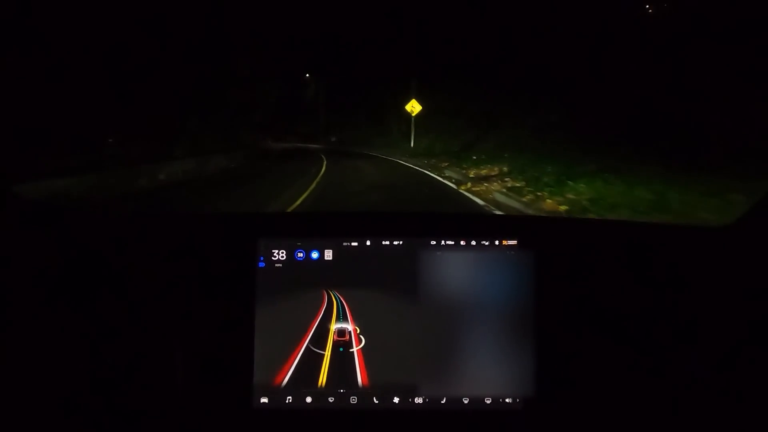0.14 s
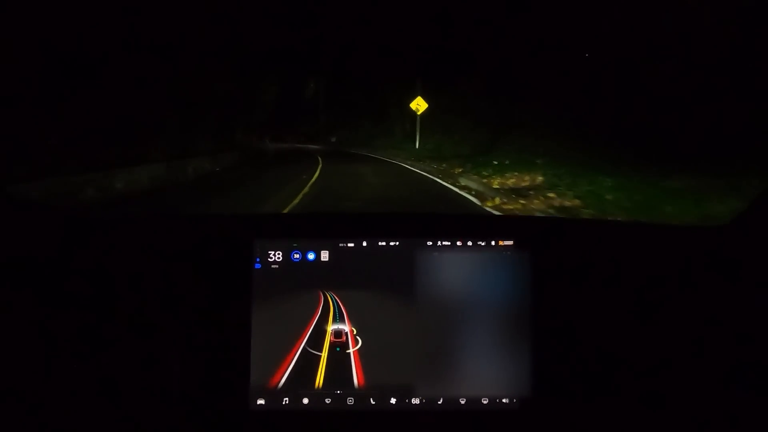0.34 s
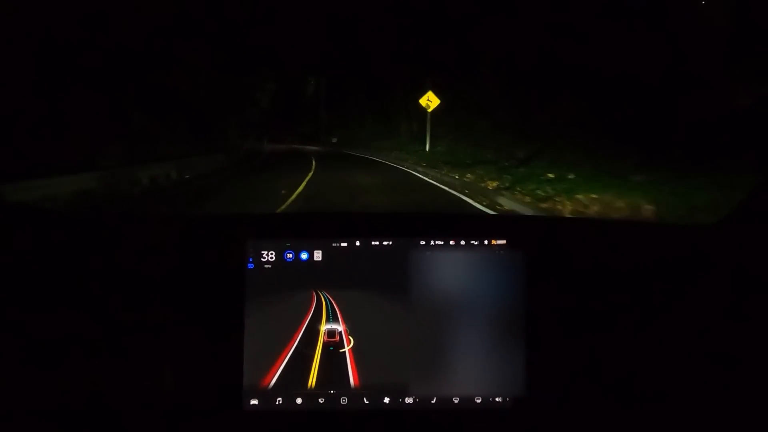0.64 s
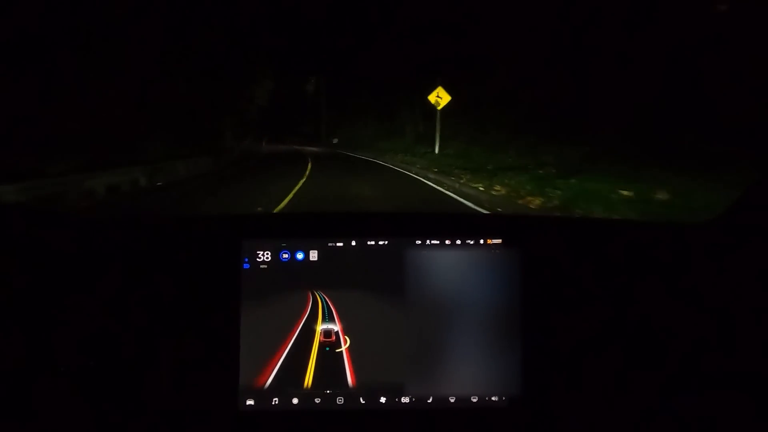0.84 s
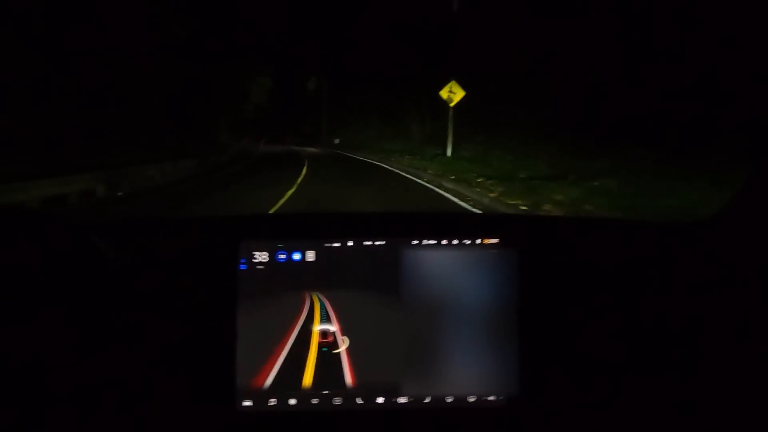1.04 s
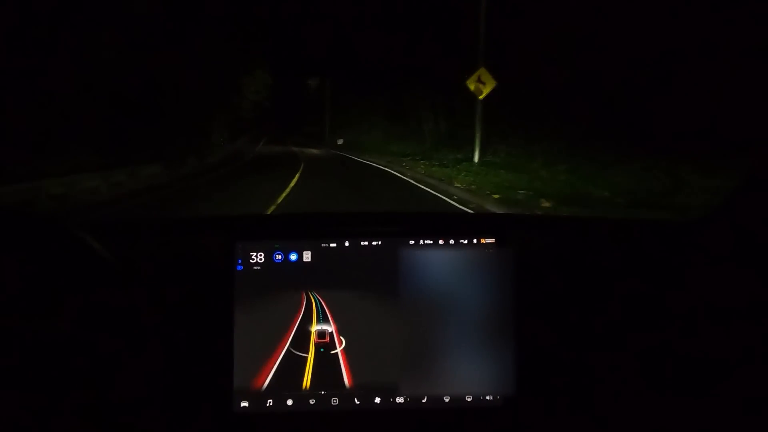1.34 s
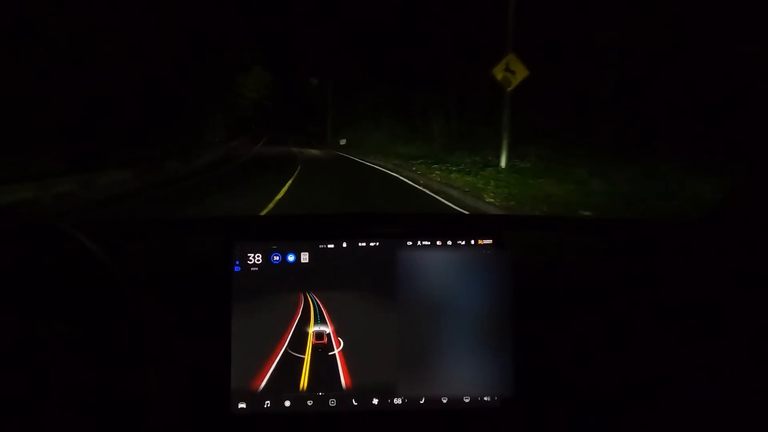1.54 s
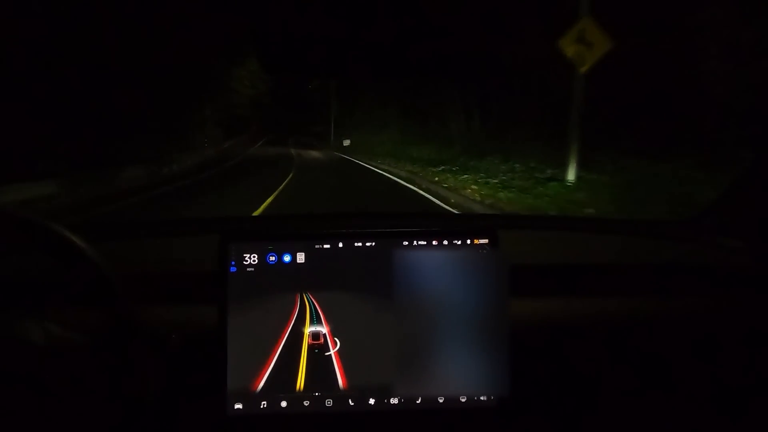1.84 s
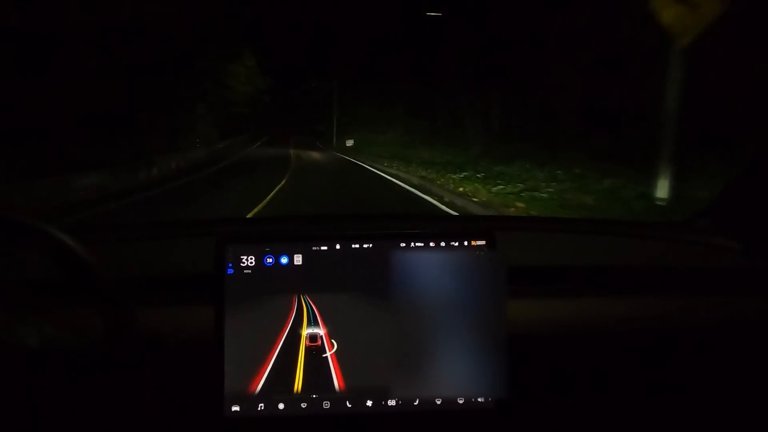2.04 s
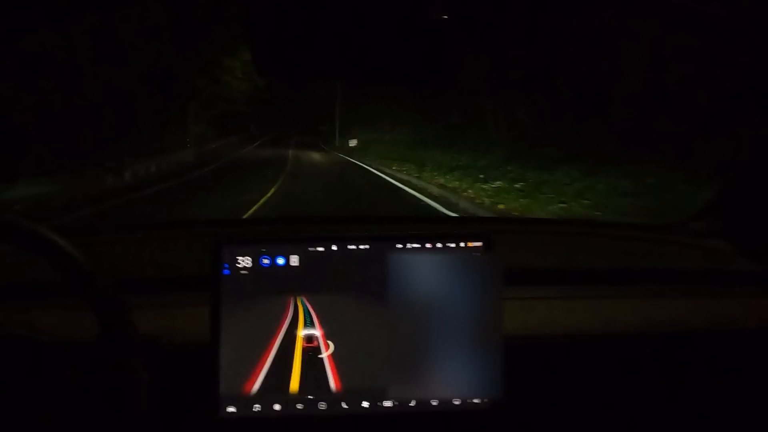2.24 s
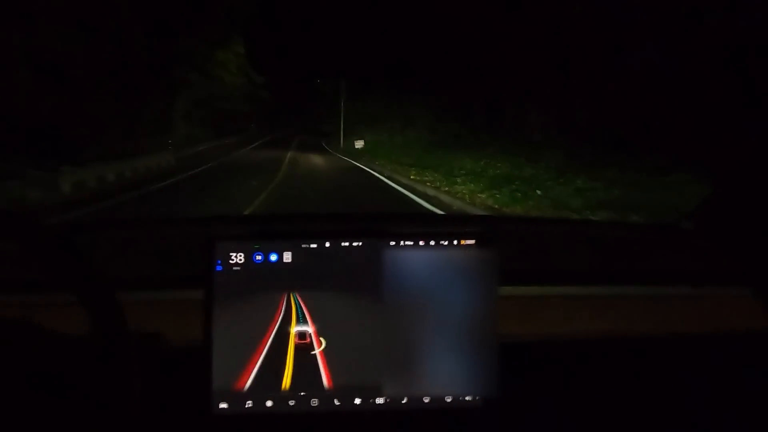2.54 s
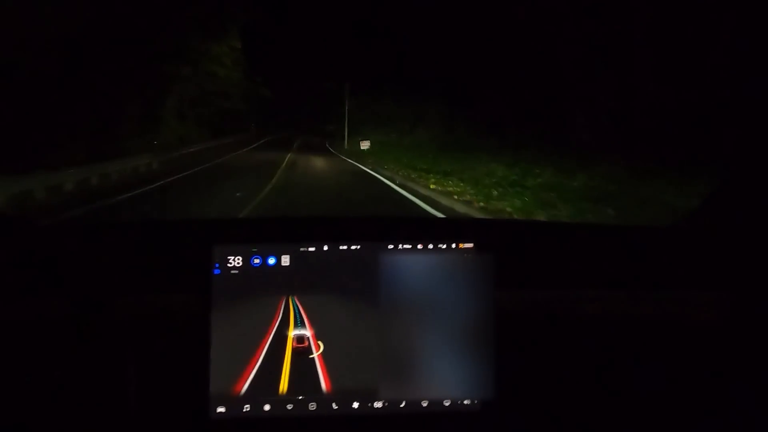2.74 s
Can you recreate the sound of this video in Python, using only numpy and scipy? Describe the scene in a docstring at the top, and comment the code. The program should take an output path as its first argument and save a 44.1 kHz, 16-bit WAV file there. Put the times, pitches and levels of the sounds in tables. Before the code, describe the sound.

Deep road rumble fills an electric car's cabin as something loose slides twice.

```python
"""Tyres drone through the body of an electric car on a country road at night and ring the cabin.
Twice the car shudders over uneven road, swaying the cabin air at a very low frequency.
Something loose slides and hisses by stick-slip friction, and knocks once against the trim.
The deep shudder pushes an automatic gain control down, and the road noise creeps back afterwards."""
import sys
import numpy as np
from scipy import signal
from scipy.fft import rfft, irfft
from scipy.io import wavfile

SR = 44100
rng = np.random.default_rng(int(sys.argv[2]) if len(sys.argv) > 2 else 0)


def put_to_file(sound):
    """Save the sound as 16-bit audio at rate SR, in the file named by the first command-line argument."""
    columns = np.atleast_2d(sound).T  # one column per channel
    safe = np.clip(columns, -1, 1)
    whole_steps = np.round(safe * 32767)
    wavfile.write(sys.argv[1], SR, whole_steps.astype(np.int16))


N = 127890
T = np.arange(N) / SR
HZ = np.fft.rfftfreq(N, 1 / SR)

# Noise spectra. Each row: frequency in Hz, relative spectral density in dB.
BOOM_SPECTRUM = [(8, -33.5), (20, 0.5), (28, -2), (36, -0.5), (48, -12.5), (65, -19), (120, -49.5),
                 (600, -140)]  # deep boom of the cabin air
RUMBLE_SPECTRUM = [(25, -24.5), (52, 1), (76, 4.5), (96, -1.5), (122, 0), (160, -10.5), (205, -12.5),
                   (255, -12.5), (330, -23), (450, -30.5), (800, -49.5), (3000, -125)]  # road noise through the body
ROAR_SPECTRUM = [(100, -13.5), (400, 7), (650, -2.5), (1000, 2), (1300, -4), (1550, -12), (1850, -16),
                 (2300, -21.5), (3500, -28.5), (5000, -36), (7300, -43.5), (10000, -51.5), (15000, -68)]  # tread and air
HISS_SPECTRUM = [(200, -14.5), (900, 4.5), (1350, 2), (1800, 0.5), (2600, -6.5), (3700, -7.5),
                 (4700, -18.5), (5800, -22), (7400, -23.5), (9000, -37), (12000, -48.5), (16000, -63.5)]  # middle of the sliding sound
SCRAPE_SPECTRUM = [(30, -45.5), (180, -15.5), (270, -0.5), (315, 4), (370, 6), (520, 9), (660, 7.5),
                   (820, 0), (1200, -6), (2200, -20), (6000, -42), (12000, -78)]  # its low part
FIZZ_SPECTRUM = [(500, -33.5), (2000, 0.5), (4500, 2), (5900, 0), (7300, -2.5), (8300, -12), (9500, -17.5),
                 (12000, -25.5), (16000, -49)]  # its bright part
# Coarseness of the road. Each row: time in seconds, gains in dB of boom, rumble, roar and tyre hum.
ROAD_SURFACE = [(0, -2, -1, -0.5, 1), (0.401, -1, -1.5, -.5, -1.5), (0.599, -2, -0.64, -1, 4),
                (0.901, -3.5, -0.5, -.5, 2.5), (1.22, 3, -1.3, -1.2, -0.5), (1.33, 5.5, -4.5, 1, -8.5),
                (1.601, -1, -2.1, -2.5, -5), (1.901, 3.5, 0.5, -0.5, 1.5), (2.16, 3.5, 1, 0.8, 3),
                (2.45, 6.5, 1.5, 1.5, 1.5), (2.61, 7, -4, -1, -5), (2.76, 3, 0, -3, 1.5),
                (2.87, 0.5, -11.5, 0, 3)]
# Air resonances. Each row: frequency in Hz, half width in Hz, rms level in dB before the road's gain.
TYRE_MODES = [(182.66, 12, -31.5), (194.7, 11, -33.5)]
CABIN_MODES = [(309, 24, -43.5), (376.5, 20, -44.5), (579, 11, -51.5), (763, 46, -51.5), (994, 26, -60.5)]
# Shudders of the body. Each row: peak time and half length in seconds, frequency in Hz,
# level in dB, relative level of the octave in dB.
SHUDDERS = [(1.379, 0.13, 20.86, -7, -19.5), (2.554, 0.13, 17.38, -14, 8.5)]
# Slides of the loose object. Each row: peak time, rise and fall time constants in seconds,
# hiss level in dB before SLIDING_DB, scrape and fizz in dB relative to the hiss.
SLIDE_EVENTS = [(.022, .0051, .015, -62, -14.5, -10), (.944, 0.0076, 0.022, -66, -5.5, -15),
                (1.08, .0015, 0.0033, -43.5, -9, -21), (1.089, .003, 0.0065, -49, -12, -15),
                (1.096, .005, 0.014, -48.5, -15, -16), (1.14, .039, 0.067, -66.5, -8, -4.5),
                (1.205, 0.0036, .008, -60, -10, -17), (1.235, 0.0022, 0.0227, -59.5, -12, -3),
                (1.264, 0.0095, 0.016, -51, -10, -12), (1.288, .01, 0.013, -44, -6, -9),
                (1.307, .012, 0.041, -50, -7, -10), (1.356, .012, .03, -55, -10, -11.5),
                (2.21, .0044, .02, -63, -11.5, -14.5), (2.345, 0.0061, 0.023, -53.5, 0, -8),
                (2.377, 0.014, .026, -48.5, -3, -11.5), (2.411, .018, .03, -45, -0.5, -12.5),
                (2.427, 0.009, 0.0091, -63, -9.5, 9.5), (2.456, 0.012, 0.027, -48.5, -11, -12),
                (2.516, .003, .012, -43.5, -5.5, -16), (2.534, 0.017, .03, -42.5, 0, -12.5),
                (2.555, .008, .008, -50.5, 9, -9), (2.573, .003, 0.044, -40.5, -3.5, -12),
                (2.6, .008, .02, -51, -10, -8.5), (2.626, .012, 0.02, -47, 6, -13),
                (2.701, .003, 0.056, -62.5, -20, -6), (2.866, .008, 0.036, -64, -17, -6)]
# Resonances of the loose object. Each row: frequency in Hz, half width in Hz, lift in dB.
OBJECT_MODES = [(1800, 160, 3.5), (2780, 70, 0), (3000, 110, 1), (4170, 42, 4.5), (4640, 45, 5.5)]
# Modes of the trim. Each row: frequency in Hz, relative level in dB, seconds to decay by 60 dB.
TRIM_MODES = [(321.3, -34, 0.35), (620, -33.5, 0.045), (770, -27, 0.035), (1060, -27, 0.028),
              (1720, -36.5, .018), (2480, -47, 0.016), (4215, -50, .07)]
# Likeness of the sound at the two microphones. Each row: frequency in Hz, coherence from 0 to 1.
ROAD_COHERENCE = [(60, .998), (130, .99), (290, .97), (640, .83), (1400, .73), (3100, .42), (6800, .3),
                  (12000, .7)]
SLIDE_COHERENCE = [(200, .96), (700, .78), (1500, .7), (3100, .4), (6800, .25), (10000, .7)]
# Stereo balance of the noises. Each row: frequency in Hz, left minus right in dB.
LEFT_BALANCE = [(100, -0.5), (220, -1), (380, -1.6), (700, -4.5), (2400, -4.5), (4400, -4.5), (8500, 1)]
# Phase difference of the sliding sound. Each row: frequency in Hz, lead of the left side in radians.
SLIDE_LEAD = [(300, 0.17), (1800, 0.42), (2800, 0.34), (4800, 0.064)]

BOOM_DB, RUMBLE_DB, ROAR_DB, SLIDING_DB = -19, -20, -43.5, 6
GRAIN_DB, GRAIN_S = 3, 0.0007  # depth and time scale of stick and slip
KNOCK_AT_S, KNOCK_RISE_S = 2.5685, 0.00058
RIPPLE_DB, REFLECTION_DECAY_S = 2, 0.014
THRESHOLD_DB, DUCK_DB_PER_DB, SENSE_S, RECOVERY_DB_PER_S = -13.5, 0.83, 0.156, 0.5
FADE_S, CUTOFF_HZ = 0.008, 15700


def road_noise():
    """Forced vibration: rough asphalt drives tyres, body and cabin air, at levels set by its coarseness."""
    times, *gains = np.transpose(ROAD_SURFACE)
    boom_db, rumble_db, roar_db, hum_db = [np.interp(T, times, gain) for gain in gains]
    boom = steadied(noise(amp(curve(BOOM_SPECTRUM)), ROAD_COHERENCE), seconds=0.1)
    boom *= amp(BOOM_DB + boom_db)
    rumble = steadied(noise(amp(curve(RUMBLE_SPECTRUM)), ROAD_COHERENCE), seconds=0.13)
    rumble *= amp(RUMBLE_DB + rumble_db)
    tyre_hum = air_resonances(TYRE_MODES, steady_s=0.18) * amp(hum_db)
    cabin_ring = air_resonances(CABIN_MODES, steady_s=0.4) * amp(roar_db)
    roar = noise(amp(curve(ROAR_SPECTRUM)) * cabin_reflections(), ROAD_COHERENCE)
    roar *= amp(ROAR_DB + roar_db + 0.49 * wander(seconds=0.032))
    return boom + rumble + tyre_hum + cabin_ring + roar


def air_resonances(modes, steady_s):
    """Resonance: enclosed air, driven at random by the road, rings in a narrow band at each mode."""
    return sum(amp(db) * steadied(noise(peak(hz, width), ROAD_COHERENCE), steady_s)
               for hz, width, db in modes)


def shudder():
    """Structure-air coupling: at each bump the body sways the cabin air at a low tone and its octave."""
    sway = np.zeros(N)
    for peak_s, half_s, hz, db, octave_db in SHUDDERS:
        phase = 2 * np.pi * hz * (T - peak_s) + 0.21 * wander(seconds=0.23)
        swell = amp(db) * np.exp(-abs((T - peak_s) / half_s) ** 4.2)
        sway += swell * (np.sin(phase) + amp(octave_db) * np.sin(2 * phase))
    return sway * pan(left_db=0.3)


def sliding():
    """Stick-slip friction: grainy hiss, scrape and fizz swell and die with each slide; powers add."""
    hiss, scrape, fizz = np.zeros((3, N))
    for peak_s, rise_s, fall_s, db, scrape_db, fizz_db in SLIDE_EVENTS:
        level = amp(db) * np.exp(-np.maximum((peak_s - T) / rise_s, (T - peak_s) / fall_s))
        hiss += level ** 2
        scrape += (level * amp(scrape_db)) ** 2
        fizz += (level * amp(fizz_db)) ** 2
    object_db = sum(db * peak(hz, width) for hz, width, db in OBJECT_MODES)
    colour = cabin_reflections() * amp(object_db)
    friction = np.zeros((2, N))
    for power, spectrum in [(hiss, HISS_SPECTRUM), (scrape, SCRAPE_SPECTRUM), (fizz, FIZZ_SPECTRUM)]:
        grain = unit_rms(amp(GRAIN_DB * wander(GRAIN_S)))
        band = noise(amp(curve(spectrum)) * colour, SLIDE_COHERENCE, curve(SLIDE_LEAD))
        friction += np.sqrt(power) * grain * band
    return amp(SLIDING_DB) * friction


def trim_knock():
    """Free vibration: after one light blow, the damped modes of the trim decay exponentially."""
    age = np.maximum(T - KNOCK_AT_S, 0)
    ring = sum(amp(db - 60 * age / t60) * np.sin(2 * np.pi * (hz * age + rng.random()))
               for hz, db, t60 in TRIM_MODES)
    attack = 1 - np.exp(-age / KNOCK_RISE_S)
    return 2 * ring * attack * pan(left_db=-1)


def cabin_reflections():
    """Interference: reflections put dense, fixed peaks and dips on the upper range of a spectrum."""
    decay = np.exp(-T / REFLECTION_DECAY_S)
    echoes = rng.standard_normal(N) * decay * (1 - decay)
    ripple = unit_rms(rfft(echoes).real)
    return amp(RIPPLE_DB * ripple * HZ / (HZ + 700))


def noise(gain, coherence_table, left_lead=0):
    """Partial coherence: two microphones share part of a coloured noise of rms 1."""
    common, separate = rfft(rng.standard_normal((2, N)))
    coherence = np.clip(curve(coherence_table), -1, 1)
    lean = amp(curve(LEFT_BALANCE) / 2)
    left = common * lean * np.exp(1j * left_lead)
    right = (coherence * common + np.sqrt(1 - coherence ** 2) * separate) / lean
    return unit_rms(irfft(np.array([left, right]) * gain, N))


def steadied(x, seconds):
    """Envelope division evens out the slow swells of a narrow noise."""
    return unit_rms(x / np.sqrt(mean_power(x, seconds) + 0.03))


def mean_power(x, seconds):
    """Mean square of both channels under Gaussian smoothing."""
    return abs(irfft(rfft((x ** 2).mean(0)) * np.exp(-(HZ * seconds) ** 2), N))


def wander(seconds):
    """Random modulation: low-passed noise of rms 1 that changes over the given time."""
    lowpass = np.exp(-(HZ * seconds) ** 2) * (HZ > 0)
    return unit_rms(irfft(rfft(rng.standard_normal(N)) * lowpass, N))


def peak(hz, half_width):
    """Lorentzian resonance curve of height 1."""
    return 1 / (1 + ((HZ - hz) / half_width) ** 2)


def curve(table):
    """Interpolation of a table on a logarithmic frequency axis."""
    hz, value = np.transpose(table)
    return np.interp(np.log(HZ + 1), np.log(hz + 1), value)


def pan(left_db):
    """Level difference: channel gains with the left louder by left_db."""
    return amp(left_db * np.array([[0.5], [-0.5]]))


def amp(db):
    """Decibels to amplitude ratio."""
    return 10 ** (np.asarray(db) / 20)


def unit_rms(x):
    """Normalisation to rms 1."""
    return x / np.sqrt(np.mean(x ** 2) + 1e-20)


def scene():
    """Superposition: the pressures of all sources add in the cabin."""
    return road_noise() + shudder() + sliding() + trim_knock()


def record(dry):
    """Compression: the gain ducks quickly and recovers slowly; a short fade-out and a low-pass follow."""
    excess_db = 10 * np.log10(mean_power(dry, SENSE_S) + 1e-9) - THRESHOLD_DB
    recovery_db = T * RECOVERY_DB_PER_S
    held_db = np.maximum.accumulate(excess_db + recovery_db) - recovery_db
    duck_db = DUCK_DB_PER_DB * np.maximum(held_db, 0)
    fade = np.sin(np.pi / 2 * np.minimum((T[-1] - T) / FADE_S, 1)) ** 2
    lowpass = signal.firwin(511, CUTOFF_HZ, window=("kaiser", 9), fs=SR)
    return signal.oaconvolve(dry * amp(-duck_db) * fade, lowpass[None], "same")


dry = scene()
out = record(dry)
put_to_file(out)
```